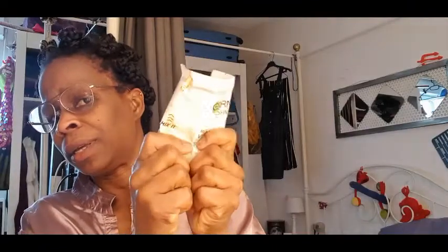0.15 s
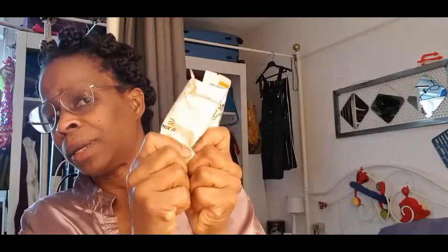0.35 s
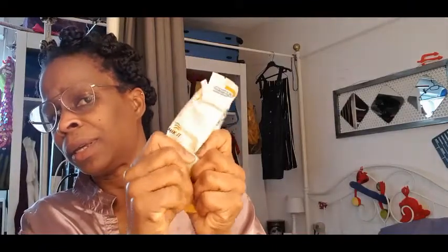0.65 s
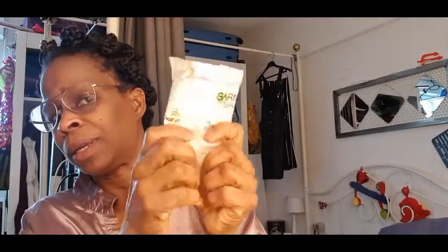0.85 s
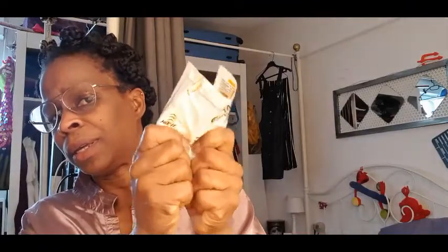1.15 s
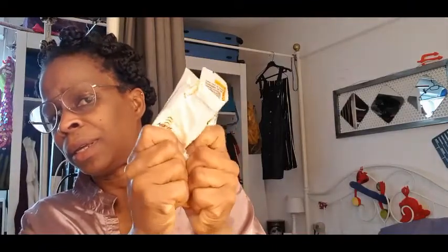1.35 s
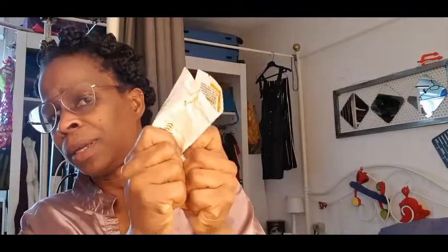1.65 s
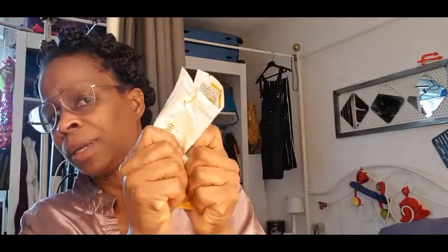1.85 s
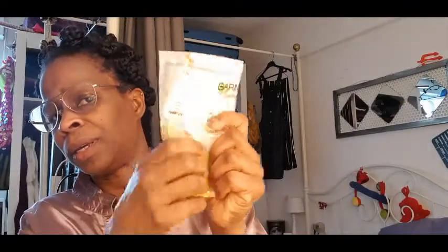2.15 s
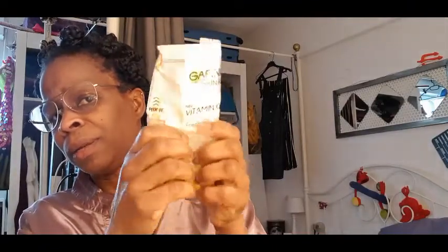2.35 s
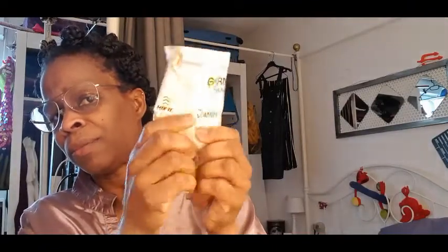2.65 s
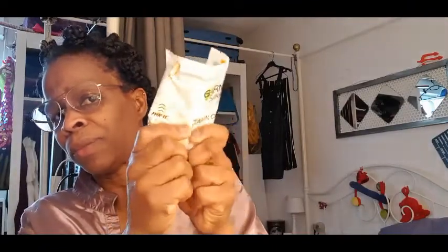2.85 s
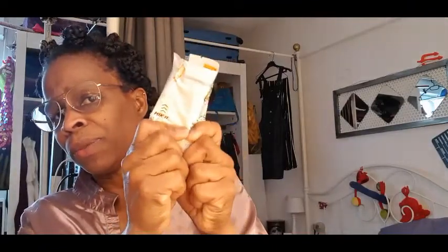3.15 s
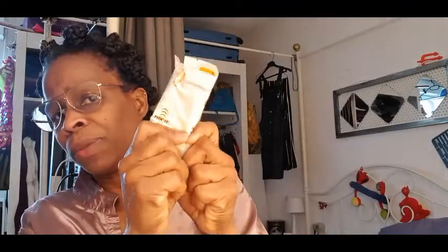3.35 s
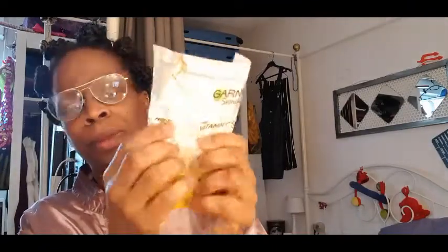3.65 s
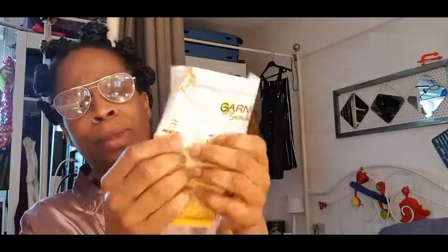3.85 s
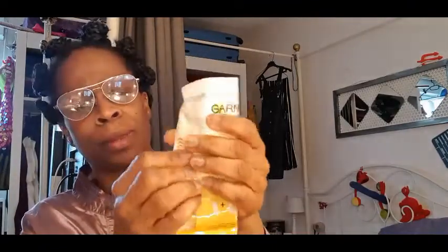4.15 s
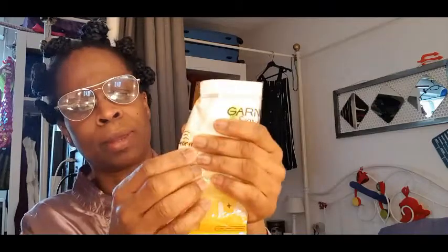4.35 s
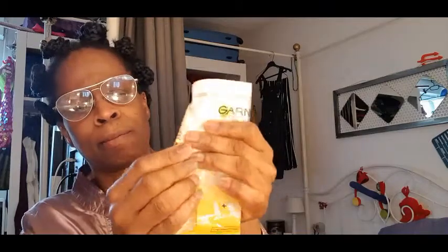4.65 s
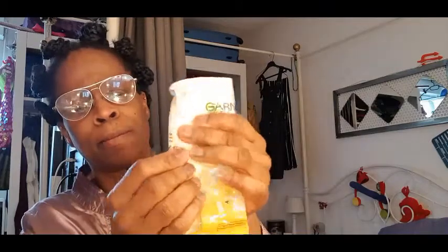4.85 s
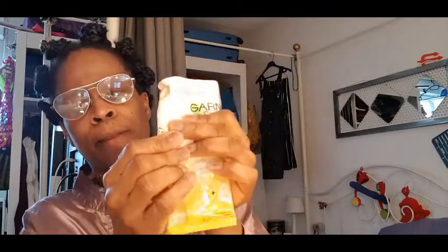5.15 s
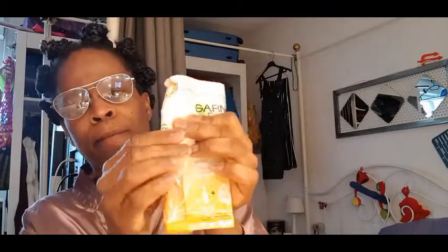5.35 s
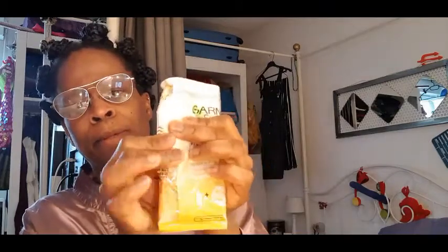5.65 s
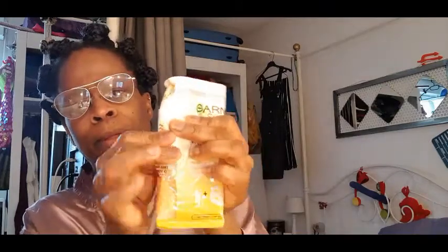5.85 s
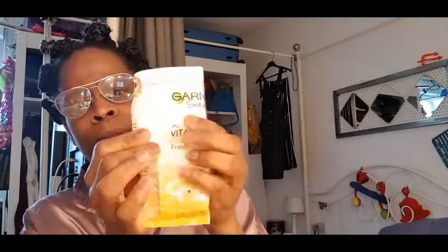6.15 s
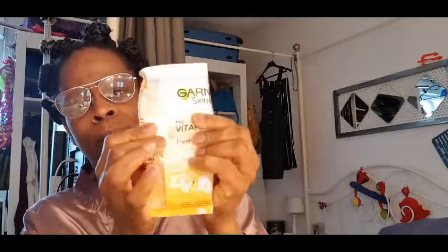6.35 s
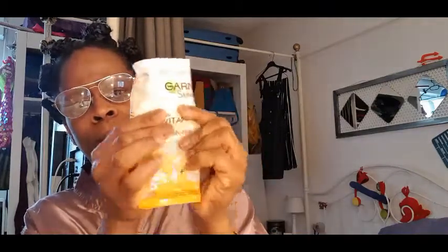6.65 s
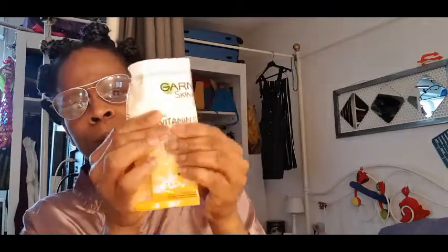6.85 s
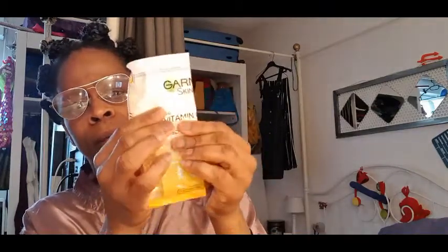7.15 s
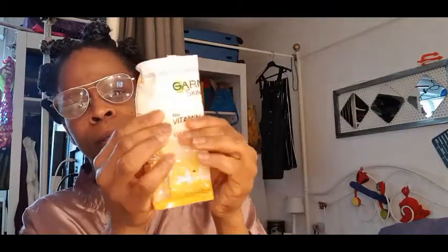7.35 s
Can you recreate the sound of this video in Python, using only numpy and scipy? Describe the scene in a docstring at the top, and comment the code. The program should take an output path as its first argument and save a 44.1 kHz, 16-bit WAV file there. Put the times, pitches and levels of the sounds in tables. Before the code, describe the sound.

Close, dry crackling of a plastic pouch being squeezed, with sharp creasing snaps, soft low rubbing and faint thuds over gentle hiss.

```python
"""In a small soft bedroom, a stiff plastic sachet is kneaded in both hands close to a two-port microphone.
Creases buckle with short snaps, shaped noise bursts through broad resonances; thousands of smaller ones crackle.
Fingers rub and press the filled pouch, a low lumpy noise, and the filling slumps with soft low-tone thuds.
Surfaces beside the microphone return snaps and crackle within about two milliseconds; the room answers
with a brief diffuse tail, over a steady hush and hiss."""
import sys
import numpy as np
from scipy import signal
from scipy.fft import rfft, irfft, next_fast_len
from scipy.io import wavfile
from scipy.ndimage import map_coordinates

SR = 44100
rng = np.random.default_rng(int(sys.argv[2]) if len(sys.argv) > 2 else 0)


def to_wav(sig):
    """Store sig (one row per channel, or 1-D mono) as 16-bit WAV at the path in sys.argv[1].

    Samples outside -1..1 are clipped; the rate is SR.
    """
    pcm = np.clip(np.atleast_2d(sig), -1, 1) * 32767
    pcm = np.round(pcm).astype(np.int16)
    wavfile.write(sys.argv[1], SR, pcm.T)  # frames by channels


N = 331191  # length in samples


def amp(db):
    """Gain of a level in dB."""
    return 10 ** (np.asarray(db) / 20)


def unit(x):
    """x scaled to rms 1 over all its channels."""
    return x / np.sqrt(np.mean(x ** 2) + 1e-20)


def along(points, hz):
    """Curve through (frequency [Hz], value) points, straight on a log-frequency axis."""
    point_hz, value = np.transpose(points)
    return np.interp(np.log(hz + 1), np.log(point_hz + 1), value)


def filtered(x, response):
    """x through a filter given as a complex response of frequency."""
    length = next_fast_len(x.shape[-1] + 8192)
    spectrum = rfft(x, length) * response(np.fft.rfftfreq(length, 1 / SR))
    return irfft(spectrum, length)[..., :x.shape[-1]]


def wobble(rate):
    """A smooth random curve with rate knots a second."""
    knots = rng.standard_normal(int(N * rate / SR) + 4)
    return map_coordinates(knots, [np.arange(N) * rate / SR])


def resonance(hz, centre_hz, width_hz):
    """A causal band-pass of gain 1 at its centre."""
    return 1j * hz * width_hz / (centre_hz ** 2 - hz ** 2 + 1j * hz * width_hz)


# colour of room hush and microphone hiss: (frequency [Hz], relative density [dB per Hz])
HUSH_COLOUR = [(15, -57), (25, -5), (91, -5), (247, -20), (342, -21), (746, -34), (1920, -22.5),
               (2440, -31.5), (6990, -35.5), (7790, -25.5), (12000, -19), (15700, -23)]
HUSH_DB, HUSH_TOP_HZ = -69.0, 15750  # rms before the microphone's bass cut; upper edge


def hush():
    """Steady hush and hiss: coloured noise, unrelated at the two ports."""
    white = rng.standard_normal((2, N))
    noise = filtered(white, lambda hz: amp(along(HUSH_COLOUR, hz)) * (hz < HUSH_TOP_HZ))
    return amp(HUSH_DB) * unit(noise)


# squeezes of the hands:
# (peak time [s], relative crackle level [dB], relative pressing level [dB], fade [dB per s])
SQUEEZES = [(0.049, -39.5, -56.5, 200), (.69, -76, -80, 130), (0.861, -48, -72, 102), (.97, -47, -56, 300),
            (1.089, -40.5, -51, 157), (1.202, -39, -49, 304), (1.577, -60, -57.5, 194),
            (1.94, -68, -84, 198), (2.2, -41.5, -55.5, 140), (2.331, -36.5, -57, 296),
            (2.58, -40.5, -61.5, 100), (2.74, -60, -58, 98), (3.392, -65, -70, 198), (3.62, -48, -57, 112),
            (4.189, -44, -56, 117), (4.402, -50, -47, 76), (4.7, -56, -51.5, 98), (4.848, -39.5, -42, 200),
            (5.039, -49, -54, 49), (5.281, -42.5, -68, 397), (5.63, -52.5, -62, 182),
            (6.001, -41, -49, 146), (6.238, -42, -48, 88), (6.41, -55, -52.5, 198),
            (6.58, -52.5, -55.5, 200), (6.81, -49, -53, 150), (6.921, -39.5, -45, 300),
            (7.188, -38.5, -51, 176), (7.26, -49, -65, 300), (7.349, -42.5, -57.5, 102),
            (7.5, -38, -62, 98)]
RISE_DB_PER_S = 298.5
REST_CRACKLE_DB, REST_PRESS_DB = -74.5, -79.5  # the hands merely hold the pouch


def hands():
    """Crackle and pressing level curves in dB: each squeeze builds up, peaks and lets go."""
    peak_s, crackle_db, press_db, fade = np.transpose(SQUEEZES)[..., None]
    step = 64  # samples between points of the curves
    after_peak_s = np.arange(0, N + step, step) / SR - peak_s
    under_peak_db = np.where(after_peak_s < 0, RISE_DB_PER_S, -fade) * after_peak_s

    def curve(top_db, rest_db):
        """The strongest squeeze at each moment, never below the resting grip."""
        db = np.maximum(rest_db, (top_db + under_peak_db).max(axis=0))
        return np.interp(np.arange(N) / step, np.arange(len(db)), db)

    return curve(crackle_db, REST_CRACKLE_DB), curve(press_db, REST_PRESS_DB)


# parts of one snap, in order: push on the filling, hollow knock, bulging face, crease edge, sharp tick;
# each a decaying burst through a resonance used three times over:
# (centre [Hz], width of one resonance [Hz], burst t60 [s])
SNAP_PARTS = [(342, 690, 0.034), (1222, 1143, 0.0066), (2182, 1550, 0.013), (4540, 6840, 0.011),
              (11200, 11000, 0.028)]


def buckle(times, parts_db, alike, size=640, order=128):
    """Snaps as a faint lead-in, a sudden flip and a dying rattle through broad resonances: left, right, all-round."""
    t = (np.arange(size) - order) / SR  # the flip is at 0
    hz = np.fft.rfftfreq(2 * size, 1 / SR)
    burst = rng.standard_normal((len(times), 3, size))
    burst[:, 0, order] = 4.33 * np.sign(burst[:, 0, order])  # the crease flips at once, in or out
    # the ports face the crease from slightly different sides: a common part and a part of their own
    pair = np.sqrt(alike) * burst[:, :1] + np.sqrt(1 - alike) * burst[:, 1:]
    # averaged over all directions the rattle evens out: the walls hear only the flip
    all_round = burst[:, :1] * (t == 0)
    heard = np.concatenate([pair, all_round], axis=1)
    # faint noise rises steeply, over a few milliseconds at most, before the flip
    lead_in = amp(-13 + 60 * t / .008)
    snap = 0
    for k, (centre_hz, width_hz, t60) in enumerate(SNAP_PARTS):
        shape = np.where(t < 0, lead_in, amp(-60 * t / t60))
        sign = (-1) ** k  # neighbours alternate so that their flanks add
        band = sign * resonance(hz, centre_hz, width_hz) ** 3
        part = irfft(rfft(heard * shape, 2 * size) * band)[..., :size]
        part /= np.linalg.norm(part, axis=2, keepdims=True)
        snap = snap + amp(parts_db[:, k])[:, None, None] * part
    # lay every snap on the timeline with its flip at the given time
    starts = np.round(times * SR).astype(int)[:, None]
    at = (starts + np.arange(size)).ravel()
    return np.array([np.bincount(at, snap[:, c].ravel(), N + size)[order:N + order] for c in range(3)])


def crackle(level_db, count=4500):
    """Many small creases give way at random, fusing into a rustle; a few stand out."""
    luck = rng.random((count, 7))
    times = luck[:, 0] * (N - 1) / SR
    strength_db = -2.7 * np.log(luck[:, 1:2] + 1e-9)
    spread_db = 20 * (luck[:, 2:] - .5)
    parts_db = strength_db + [-13.0, -1.0, 3.0, -2.5, -19] + spread_db
    creases = buckle(times, parts_db, alike=0.95, size=320, order=32)
    return amp(level_db + 1.2) * unit(creases)


# colour of the pressing: (frequency [Hz], relative density [dB per Hz])
PRESS_COLOUR = [(25, -33.5), (60, -4.5), (130, -6.5), (300, -8), (600, -6), (1000, -21.5), (1600, -120)]


def pressing(level_db):
    """Fingers shift the filling: low noise of lumpy level, nearly alike at both ports."""
    mid, side = filtered(rng.standard_normal((2, N)), lambda hz: amp(along(PRESS_COLOUR, hz)))
    lumps = amp(4.6 * wobble(24))
    ports = np.array([1.72 * mid + 0.11 * side, mid - .35 * side])
    return amp(level_db + 0.1) * unit(lumps * ports)


# buckling creases, levels before housing and reflections:
# (time [s], energy of the face [dB], hollow knock over the face [dB], treble slope [dB per octave])
SNAPS = [(0.013, -16.5, 5, -6), (0.0388, -30.5, 14, -1.5), (0.055, -7.5, -12, -5),
         (0.0791, -5.5, -10, -12.5), (0.1107, -23.5, -1, -5.5), (0.168, -14, -17, -8.5),
         (0.384, -47, 18, -18), (0.669, 4.5, -19, -3), (0.6854, -7, -0.5, -2.3), (0.7037, -8, -6, -4),
         (0.724, -2, -12.5, -8), (0.8378, -20.5, 4.5, -15), (0.8713, -25, -1, 4.2), (0.9461, -13, 3, -4),
         (0.9634, -5, -15, -7.5), (1.042, -28.5, -6.5, 2.5), (1.066, -11.5, -1.5, -13.5),
         (1.0781, -14, -3, -5), (1.0921, -8, -9, -9), (1.1241, -2.5, -11.5, -6.5), (1.1572, -18, -9, -2.1),
         (1.182, -9.5, -1, -12.5), (1.2056, -15, -6, -14.5), (1.2304, -17, -1, -21.5),
         (1.4767, -25, -8, -24), (1.5478, -14.5, -15, 7.5), (1.574, -0.5, -4.5, 3.2), (1.697, -13, -19, -1),
         (1.7263, -2.5, -34, -1.5), (2.0025, -5, -16, -9.5), (2.1119, -12.5, -20, -1.5),
         (2.135, -17.5, -1.5, -0.3), (2.1727, -22, 10.5, 0.5), (2.207, -6.5, -4, -4), (2.2226, -14, 0, -3),
         (2.2845, -16, 0.5, -30), (2.3091, -19, 6, -13.5), (2.322, -18, -14, -12.5), (2.333, -9.5, 3, -6.5),
         (2.343, -15.5, -1, 0.5), (2.4255, -17.5, -7, -3.5), (2.4345, -11, -3, -8),
         (2.4993, -21.5, 0.5, -13), (2.56, -7.5, -11, -2), (2.59, -7.5, -7, -11), (2.597, -18, 0, -6),
         (2.6274, -9, -9, 3.5), (2.6605, -26, 11.5, 1.5), (2.703, -21.5, 6, -13.5), (2.74, -6.5, -4, -6.5),
         (2.7931, -16, 0, 1.7), (2.8089, -14, -5.5, -6), (2.831, -13.5, -5, -8), (2.8524, -8, -6, -8.5),
         (2.8974, -14, -17, -16), (2.9416, -12, -15.5, -11.5), (2.988, -18, -11, -7.5),
         (3.0469, -17.5, -4, -10.5), (3.1763, -7.5, -11, -9.5), (3.385, -8.5, -22.5, -10.5),
         (3.3971, -8, -24, -8.5), (3.5433, -8.5, -10, -16.5), (3.5735, -17.5, -21, -7),
         (3.5941, -6.5, -9, -8), (3.617, -9, 5, -7.5), (3.6305, -17.5, 6, 1), (3.6472, -20.5, 7, -2.5),
         (3.834, -2, -5.5, -10), (3.9193, -12.5, -7, -15.5), (3.956, -7.5, -3.5, 4.1),
         (4.0827, -7.5, -14, -18), (4.0901, -3.5, -13.5, -32.5), (4.1201, 2.5, -10, -5),
         (4.1712, 7.5, -19.5, -10.5), (4.2, -17.5, 1, -19.5), (4.2068, -23.5, -5, -22),
         (4.2443, -7, -15, -41), (4.379, -11, 8.5, 6.4), (4.3877, -1, -3, 0.5), (4.4, -10.5, -11, 3.2),
         (4.456, -1.5, -14, -14), (4.471, -4, -8.5, -11.5), (4.5106, -5, -15, -3),
         (4.5225, -10.5, -1.5, -6.5), (4.564, -30.5, 18.5, -5.2), (4.5896, -8.5, -5, -13),
         (4.608, -16, -1, 0), (4.635, -18, 2, 12.5), (4.6571, -19.5, -8, 3.5), (4.689, -3, -11, 0.2),
         (4.71, -6.5, -11, 1), (4.7314, -2.5, -11.5, 2.3), (4.825, -12, 1, -8.5), (4.8451, -1, -19, -11.5),
         (4.8525, -22, 8, -2.5), (4.894, -24, 7, -9.5), (4.91, -3.5, -10, -8), (4.9147, -10.5, 4, -4.5),
         (4.9753, -10, -1, -5), (5.0159, -14, -1, 0.7), (5.0261, -11, -3, -4), (5.042, -0.5, -1, 0.4),
         (5.1586, -25, -1, -9), (5.24, -16, -9, -16), (5.2598, -12, -20, -14), (5.2823, -8.5, -17, -10),
         (5.3308, -29, -1.5, -10), (5.436, -0.5, -15, 0.7), (5.5687, -18.5, -3.5, -12.5),
         (5.6277, -12.5, -9, -13), (5.6525, -36, 17, -6), (5.759, -37, 8, -2), (5.877, -31, 6, -14),
         (5.9668, -14, 6, -32), (5.9778, -11.5, -4, -4), (5.987, 0, -12.5, -7), (6.0148, -3, -5.5, -7),
         (6.0725, -10, -5, -10.5), (6.185, -29, -6, -0.5), (6.218, -0.5, -8.5, -14.5),
         (6.239, 3, -26, -3.4), (6.2437, 0.5, -13, -3.5), (6.3381, -3.5, -22, -6), (6.375, -2, -7, -5),
         (6.4006, -11, -19, -6), (6.4083, -10.5, 3, -8.5), (6.489, -6.5, 3.5, 4), (6.574, 0, -7, -0.3),
         (6.685, -6.5, -5.5, -1.5), (6.701, -9, -11, -27), (6.7379, -6, 2.5, -2.5), (6.7955, -22, 0, 1.5),
         (6.8062, -15.5, 1, -1), (6.815, -11.5, 5, 3.8), (6.862, -6, 2, -4.5), (6.9131, -14, -6, 1.7),
         (6.9184, -5, -1.5, -4), (7.102, -65, 0, -16), (7.1489, -15, 0.5, 1.5), (7.1632, -17, 5, 0.5),
         (7.1721, -11.5, -8, 1), (7.2616, -25, -7, -1.5), (7.3267, -14.5, -2, -8.5),
         (7.359, -15.5, -10, -4), (7.4108, -7, 1, 2.5), (7.493, -8, -21, -3), (7.502, -4, -12, -9)]
PUSH_DB = -17.5  # push on the filling against the knock
EDGE_DB, TICK_DB = 1.5, -5.5  # edge and tick against the treble slope


def snaps():
    """The creases that buckle loudly enough to point at; each knock also pushes the filling."""
    times, face_db, hollow_db, slope = np.transpose(SNAPS)
    _, _, face_hz, edge_hz, tick_hz = [part[0] for part in SNAP_PARTS]
    knock_db = face_db + hollow_db
    edge_db = face_db + slope * np.log2(edge_hz / face_hz) + EDGE_DB
    tick_db = face_db + slope * np.log2(tick_hz / face_hz) + TICK_DB
    parts_db = [knock_db + PUSH_DB, knock_db, face_db, edge_db, tick_db]
    return buckle(times, np.transpose(parts_db), alike=0.49)


# hollows that the microphone's housing cuts into snaps and crackle:
# (centre [Hz], width [Hz], share removed at the centre [0-1])
HOLLOWS = [(857, 290, 0.5), (1468, 293, 0.55), (2397, 1390, 0.63), (3750, 57, 0.067), (5650, 1800, 0.35)]


def housing(hz):
    """Each hollow takes a share out of one band; the ports lose the highest treble."""
    hollows = [1 - share * resonance(hz, centre_hz, width_hz) for centre_hz, width_hz, share in HOLLOWS]
    return np.prod(hollows, axis=0) / (1 + (hz / 14600) ** 14)


# direct sound and near reflections at each port: (delay [ms], signed gain before the port's level [ratio])
NEAR_LEFT = [(0, 0.77), (.635, 0.26), (2.12, -0.096)]
NEAR_RIGHT = [(.05, 0.62), (1.0, 0.34), (2.2, 0.18)]


def near(x):
    """Direct sound plus the first reflections, which are duller; their delays comb all snaps alike."""
    def comb(paths, hz):
        """Sum of the delayed paths; those later than 0.3 ms lose treble above 9 kHz."""
        total = 0
        for ms, gain in paths:
            dull = 1 / (1 + 1j * hz / 9000 * (ms > .3))
            total = total + gain * dull * np.exp(-2j * np.pi * hz * ms / 1000)
        return total

    return filtered(x, lambda hz: np.array([amp(3.5) * comb(NEAR_LEFT, hz), amp(2.5) * comb(NEAR_RIGHT, hz)]))


# dying away of the room: (frequency [Hz], t60 [s])
ROOM_DECAY = [(300, 0.16), (2000, 0.18), (6000, 0.18), (14000, 0.18)]


def room(x, size=4096, count=16384):
    """A diffuse tail of decaying noise, drawn anew for each block of 4096 samples."""
    out = np.zeros((2, N + size + count + 400))
    late = 150  # samples: walls answer a few milliseconds late
    for start in range(0, N, size):
        hz, t, bins = signal.stft(rng.standard_normal((2, count)), SR, nperseg=256)
        decay = amp(-60 * t / along(ROOM_DECAY, hz)[:, None])
        tail = signal.istft(bins * decay, SR, nperseg=256)[1][:, :count]
        tail = tail / np.linalg.norm(tail[0])
        wet = signal.fftconvolve(x[:, start:start + size], tail, axes=1)
        out[:, start + late:start + late + wet.shape[1]] += wet
    return out[:, :N]


# the filling slumps with a soft thud: (time [s], relative level [dB], pitch [Hz])
THUDS = [(1.079, -58.5, 65.6), (2.326, -55.5, 125), (2.708, -59, 139), (3.542, -54, 57.6),
         (4.068, -59, 86.1), (4.857, -51, 122), (6.026, -54, 119), (6.574, -51, 66.5)]


def thuds():
    """A few cycles of low tone that swell and fade, the same wave at both ports but stronger on the left."""
    out = np.zeros(N + SR)
    t = np.arange(SR // 5) / SR
    swell = t / 0.023 * np.exp(-t / 0.018)
    for start_s, db, hz in THUDS:
        out[round(start_s * SR):][:len(t)] += amp(db + 9.0) * swell * np.sin(2 * np.pi * hz * t)
    return out[:N] * amp([[1.5], [-1.5]])


def scene():
    """Sachet, its reflections and the quiet room."""
    crackle_db, press_db = hands()
    film = filtered(snaps() + crackle(crackle_db), housing)
    ports, all_round = film[:2], film[2:]
    return near(ports) + amp(-7.0) * room(all_round) + pressing(press_db) + thuds() + hush()


def record(dry):
    """The highest peaks are rounded off, the lowest bass drops away, nothing is kept above the band limit."""
    bass_hz, top_hz = 45, 16700
    rounded = dry / (1 + (dry / .85) ** 4) ** .25
    return filtered(rounded, lambda hz: 1j * hz / (bass_hz + 1j * hz) * (hz < top_hz))


dry = scene()
out = record(dry)
to_wav(out)
```